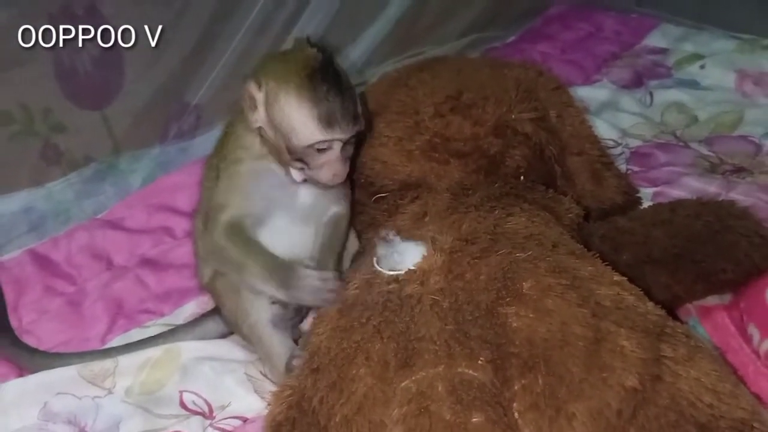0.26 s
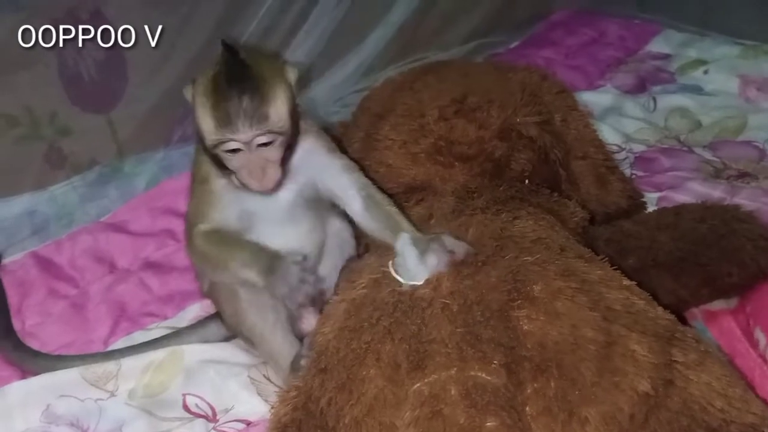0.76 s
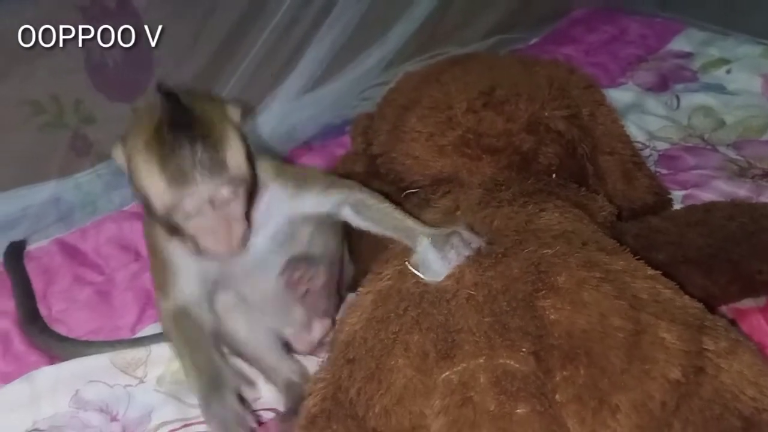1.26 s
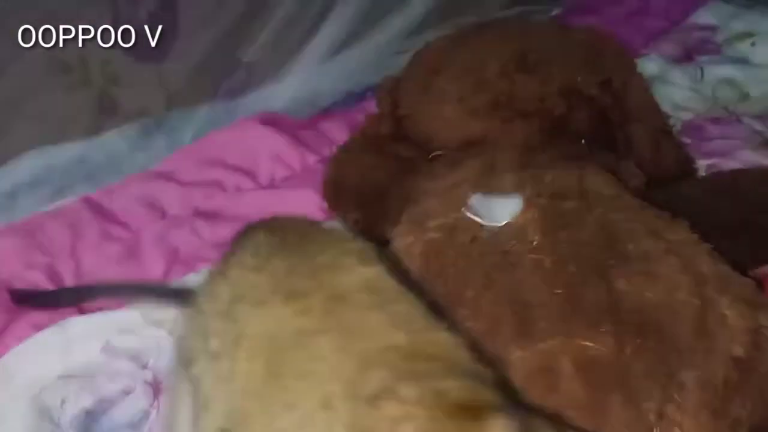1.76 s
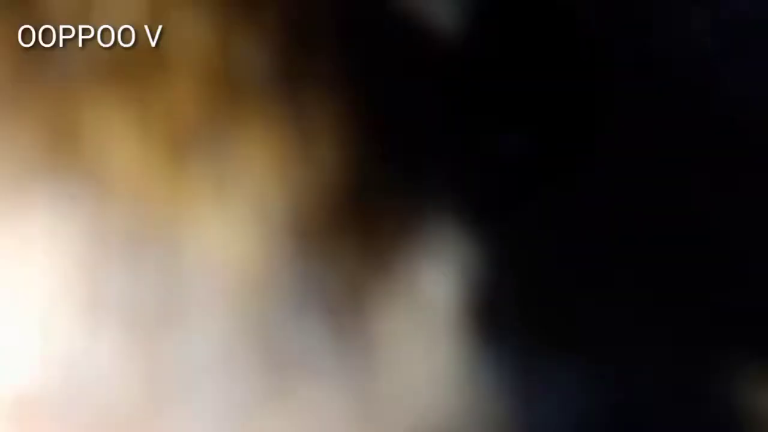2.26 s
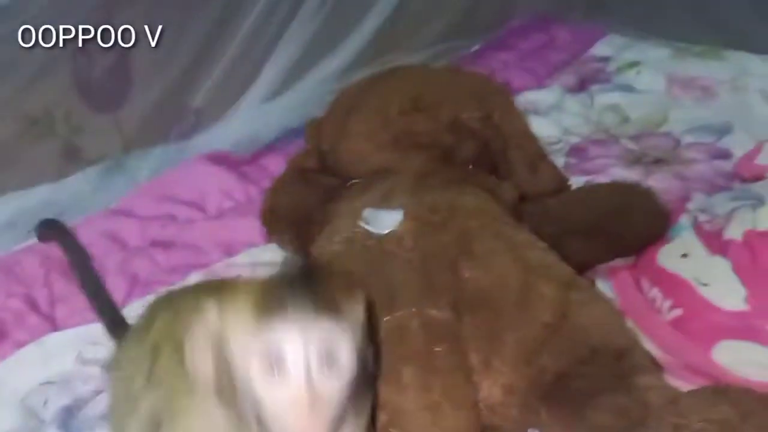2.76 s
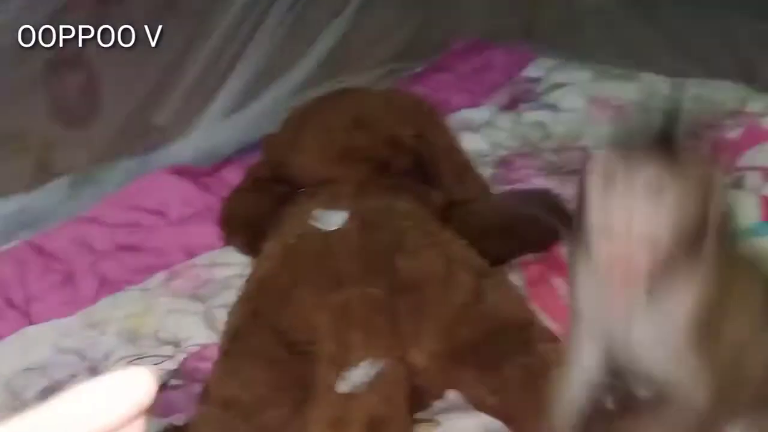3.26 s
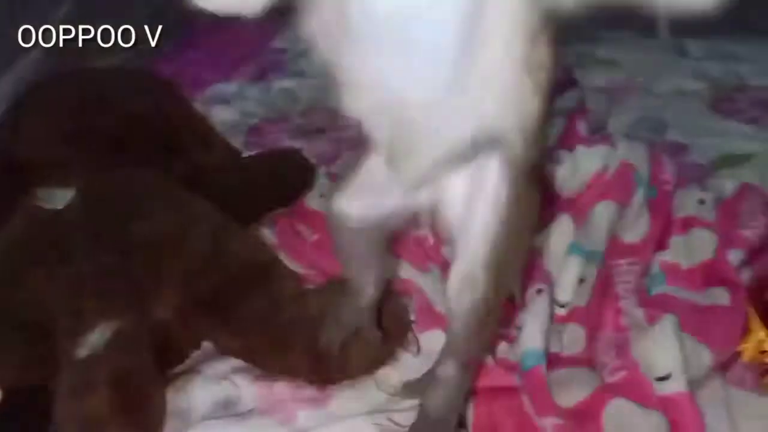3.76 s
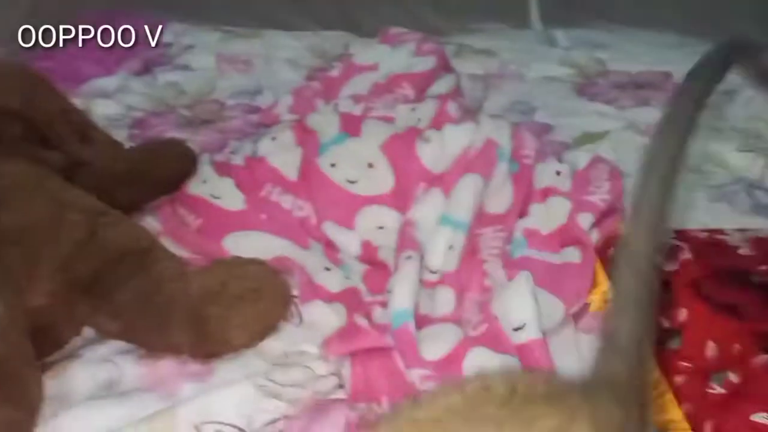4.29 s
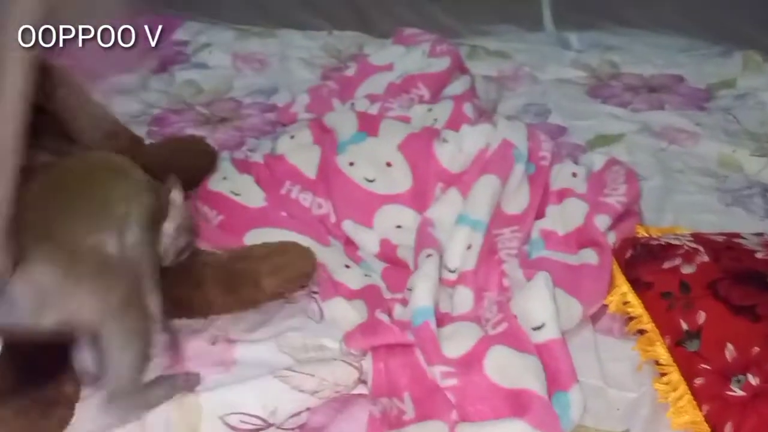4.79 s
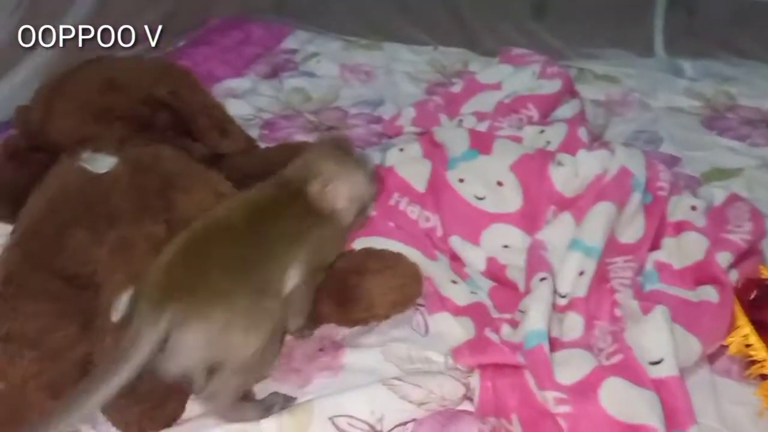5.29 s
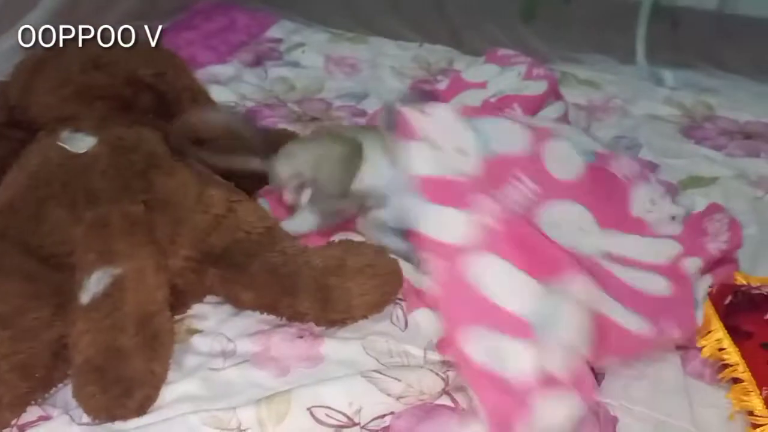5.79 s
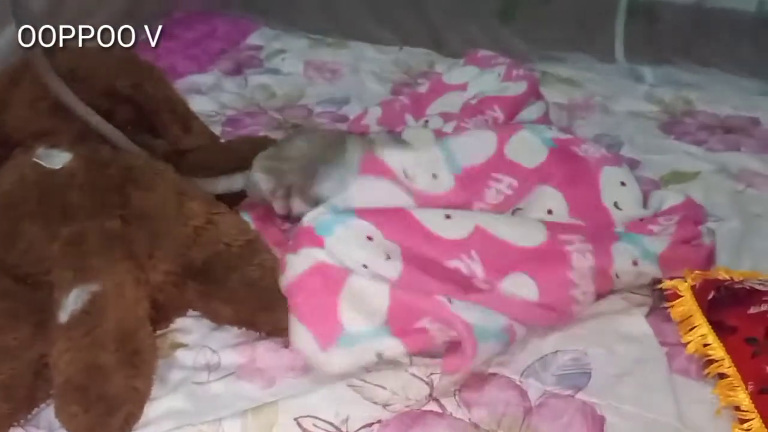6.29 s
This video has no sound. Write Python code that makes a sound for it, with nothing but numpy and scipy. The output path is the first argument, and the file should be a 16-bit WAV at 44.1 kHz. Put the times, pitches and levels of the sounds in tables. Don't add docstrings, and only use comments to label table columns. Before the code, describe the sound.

Steady quiet electrical hum with soft night hiss; a sudden burst of sharp clicks and fur scuffs hits the microphone, later a few isolated taps.

```python
import sys
import numpy as np
from scipy import signal
from scipy.fft import rfft, irfft, next_fast_len
from scipy.io import wavfile
from scipy.ndimage import uniform_filter1d

SR = 44100
rng = np.random.default_rng(int(sys.argv[2]) if len(sys.argv) > 2 else 0)


def int16_out(signal):
    q = np.round(np.clip(np.atleast_2d(signal).T, -1, 1) * 32767)
    wavfile.write(sys.argv[1], SR, q.astype(np.int16))


def convert_level_to_amplitude(level_db):
    exponent = np.asarray(level_db, float) / 20
    return 10 ** exponent


N = 288414
t = np.arange(N) / SR
HALF_EACH_SIDE = np.array([[.5], [-.5]])


def level(x, db):
    return x * convert_level_to_amplitude(db) / np.sqrt(np.mean(x ** 2))


def pan(db):
    return convert_level_to_amplitude(np.array([[min(db, 0)], [min(-db, 0)]]))


def walk(rate_hz):
    k = 8
    held = np.repeat(rng.standard_normal(int(rate_hz * N / SR) + 2), k)
    smooth = uniform_filter1d(uniform_filter1d(held, k), k)
    return 1.44 * np.interp(t * rate_hz * k, np.arange(len(held)), smooth)


def ring(x, hz, width_hz):
    return signal.lfilter(*signal.iirpeak(hz, hz / width_hz, fs=SR), x)


PLACES_S = [0, 1.9, 2.3, 3.4, 4.0, 6.54]


def by_place(first_db, second_db, third_db):
    return np.interp(t, PLACES_S, np.repeat([first_db, second_db, third_db], 2))


# (harmonic, level at first place [dB], at second [dB], at third [dB], left minus right [dB])
HUM = [(1, -57.5, -61.5, -61, -1), (2, -71, -72.5, -71.5, -0.5), (3, -66.5, -68, -76, 0.5),
       (4, -82.5, -80.5, -79.5, -5.5), (5, -72, -76, -75, -4), (6, -76, -75.5, -73.5, 9),
       (7, -74, -79, -71, 0), (8, -78.5, -78, -76, -1.5), (9, -81.5, -80.5, -81, -7),
       (12, -82, -89, -89.5, 4), (14, -79.5, -80, -79.5, 0.5)]
LEAD = [.1, -.1, .7, .6, .15, -2.0, -.7, .8, 1.8, 0, 0, .1, 0, 2.5]
SLIPS = [(1, -3), (1, -1), (1, 1), (1, 2), (1, 3), (2, -2), (2, -1), (3, 3), (6, -3)]
# (level before the phone first moves [dB], level after [dB])
SLIP_DB = [(-70.5, -80), (-80.5, -87), (-73.5, -67.5), (-75, -73), (-73, -79), (-74.5, -81), (-79, -100),
           (-81.5, -75), (-75, -101)]


def motor():
    mains2_hz, slip_hz, throb_peak_s = 100.51, 3.875, 0.3196
    start = 2 * np.pi * rng.random(len(LEAD))
    pan_of = {int(round(k)): pan_db for k, *_, pan_db in HUM}
    lines = [(int(round(k)), 0, db) for k, *db, _ in HUM]
    for (k, slips), (before_db, after_db) in zip(SLIPS, SLIP_DB):
        lines.append((int(round(k)), slips, (before_db, after_db, after_db)))
    out = 0
    for k, slips, db in lines:
        phase = 2 * np.pi * (k * mains2_hz * t + slips * slip_hz * (t - throb_peak_s)) + start[k - 1]
        if k > 1 or abs(slips) > 2:
            phase += 2 * np.pi * rng.random()
        wander_db = (0.57 + 1.0 * (slips != 0 or k % 2 == 0)) * walk(2.49)
        gain = np.sqrt(2) * convert_level_to_amplitude(by_place(*db) + wander_db + pan_of[k] * HALF_EACH_SIDE)
        out = out + gain * np.sin(phase + LEAD[k - 1] * HALF_EACH_SIDE)
    return out


def on_log_hz(hz, table):
    points = np.array(table)
    return np.interp(np.log(hz + 1), np.log(points[:, 0]), points[:, 1])


def hiss(shape, pan_db, alike_hz, swell_db, flicker_db):
    size = next_fast_len(N)
    hz = np.fft.rfftfreq(size, 1 / SR)
    colour = convert_level_to_amplitude(on_log_hz(hz, shape)) * (hz < shape[-1][0] * 1.5)
    mid, side = rfft(rng.standard_normal((2, size))) * colour
    alike = .88 / (1 + (hz / alike_hz) ** 2)
    both = np.sqrt(1 + alike) * mid + np.sqrt(1 - alike) * side * np.array([[1], [-1]])
    both = both * convert_level_to_amplitude(pan_db(hz) * HALF_EACH_SIDE)
    out, swell = 0, walk(1.5)
    for octave in range(5, 15):
        share = np.clip(1 - abs(np.log2(hz + 1) - octave), 0, 1)
        band = irfft(both * share, size)[:, :N]
        out = out + band * convert_level_to_amplitude(swell_db * swell + flicker_db * walk(9))
    return level(out, 0)


# (frequency [Hz], level per Hz [dB])
AIR = [(25, -23.5), (52, 4), (66, -7), (85, 10.5), (130, 6.5), (200, 0.5), (260, 0.5), (400, -3), (700, -1),
       (1000, -3.5), (1600, -13)]
AIR_DB = [-62, -64, -62.5]


def fan_air():
    wind = hiss(AIR, lambda hz: .5 + 0 * hz, alike_hz=520.0, swell_db=0.7, flicker_db=1.3)
    return wind * convert_level_to_amplitude(by_place(*AIR_DB))


# (frequency [Hz], level per Hz [dB])
NIGHT = [(760, -28.5), (1300, -5), (1700, -4.5), (2260, 1.5), (2900, -4), (3600, -12.5), (4600, -6.5),
         (6300, -11), (7800, -16), (8800, -12), (9800, -21), (11300, -18.5), (12300, -33), (13600, -26.5),
         (16400, -49)]
NIGHT_DB = [-64.5, -66, -66]
# (frequency [Hz], left minus right [dB])
NIGHT_PAN = [(1500, -0.5), (2400, 3), (3600, 2.5), (5000, 9.5), (8000, -0.5), (15000, -4)]


def night_air():
    far = hiss(NIGHT, lambda hz: on_log_hz(hz, NIGHT_PAN), alike_hz=550., swell_db=0.13, flicker_db=0.25)
    low_cut = signal.butter(2, 1300, "high", fs=SR, output="sos")
    return signal.sosfilt(low_cut, far * convert_level_to_amplitude(by_place(*NIGHT_DB)))


# (pitch [Hz], width [Hz], level [dB])
CRICKETS = [
    (5820, 190, -71.5),
    (5660, 49, -74.5),
    (5816, 80, -74.5),
    (5520, 250, -79),
]


def crickets():
    chorus_hz, chorus_peak_s = 4.416, .105
    out = 0
    for hz, width_hz, db in CRICKETS:
        late_s = (5800 - hz) * 6e-5
        chorus = np.cos(2 * np.pi * chorus_hz * (t - chorus_peak_s - late_s + 0.0063 * walk(1.4)))
        swell = np.clip(chorus + 1.22, 0, 9) ** 0.69 + 0.092
        scrape = 1 + 0.33 * np.cos(2 * np.pi * (45.0 * t + 1.394 * walk(3.6)))
        wing = ring(ring(rng.standard_normal((2, N)), hz, width_hz), hz, width_hz)
        out = out + level(wing * scrape * swell * convert_level_to_amplitude(0.5 * walk(2.67)), db)
    return out * pan(14.2) * 1.43


# (frequency [Hz], width [Hz], level [dB])
PORT = [(650, 410, 8), (1533, 780, 4), (2100, 1430, 4), (4670, 1100, -9.5), (6110, 1600, -10.5),
        (8300, 1230, -14.5), (11440, 2800, -16.5), (13420, 2200, -23.5)]


def port(x, treble_db):
    out = 0
    for hz, width_hz, db in PORT:
        out = out + convert_level_to_amplitude(db + treble_db * (hz > 4000)) * ring(ring(x, hz, width_hz), hz, width_hz)
    return out


def drag(out, tufts, top_s, rise_s, fall_s, db, treble_db, pan_db):
    span = slice(int(top_s * SR) - 8000, int(top_s * SR) + 16000)
    size = len(t[span])
    grains = rng.standard_normal((2, size)) * convert_level_to_amplitude(2.0 * rng.exponential(size=(2, size)))
    press = np.interp(t[span], [top_s - rise_s, top_s, top_s + fall_s], [0, 1, 0]) * tufts[span]
    steady = port(grains, treble_db)
    out[:, span] += pan(pan_db) * port(grains * press, treble_db) * convert_level_to_amplitude(db) / steady.std()


# (peak time [s], rise [s], fall [s], level [dB], left minus right [dB])
RUBS = [(1.36, .05, 0.087, -66, 5), (1.891, 0.0043, 0.0081, -37.5, 2.5), (1.907, .012, 0.042, -38.5, -5.5),
        (1.967, 0.005, .0068, -42, -5), (1.976, 0.0054, 0.042, -45, -2), (2.012, 0.0059, .008, -39, 10),
        (2.03, 0.014, 0.028, -48, 4), (2.062, 0.013, 0.021, -40, 10), (2.103, 0.033, 0.0092, -32.5, 32),
        (2.112, 0.0044, 0.0065, -27, 42), (3.759, 0.012, 0.007, -42.5, 11), (3.773, 0.013, 0.016, -41.5, 9),
        (3.795, 0.019, 0.016, -41, 20)]


def rubs():
    out, tufts = np.zeros((2, N)), convert_level_to_amplitude(1.7 * walk(600))
    for top_s, rise_s, fall_s, db, pan_db in RUBS:
        treble_db = min(1.9 * (db + 38), 6)
        drag(out, tufts, top_s, rise_s, fall_s, db, treble_db, pan_db)
    return out


def touch(out, s, db, signed_hz, cycles, crack_db, pan_db):
    at, half = int(s * SR), 1024
    cavity = signal.butter(5, [110, 3050], "band", fs=SR, output="sos")
    since = (np.arange(-half, half) + at - s * SR) / SR
    turns = since * abs(signed_hz)
    rise = np.exp(-(turns / min(0.68 * cycles, 0.00065 * abs(signed_hz))) ** 2)
    shape = np.where(turns < 0, rise, np.exp(-abs(turns) / cycles))
    squeeze = signal.sosfiltfilt(cavity, shape * np.cos(2 * np.pi * turns))
    grit = (1 + 0.37 * rng.standard_normal(2 * half)) * np.exp(-abs(since + 0.000303) * 60000)
    crack = port(grit - 0.85 * np.roll(grit, 1), 8.6)
    both = squeeze + convert_level_to_amplitude(crack_db) * crack / abs(crack).max()
    out[:, at - half:at + half] += np.sign(signed_hz) * pan(pan_db) * convert_level_to_amplitude(db) * both


# (time [s], left minus right [dB])
PAW_PAN = [(1.893, -13), (1.896, 17), (2.07, 24), (2.1, 60), (3.74, 18), (3.8, 22), (3.84, 11), (5.5, -25)]


def paw_pan(s):
    return np.interp(s, *np.array(PAW_PAN).T)


# (time [s], peak level [dB], ring [Hz, minus for a pull], fade [cycles], crack [dB])
NAILS = [(1.8922, -25, -900, 0.37, -13), (1.903, -23, 1498, 0.39, -10), (1.99, -33, 2300, .8, -12),
         (1.9962, -0.5, 2002, .8, -22), (2.0105, -29, 2200, 2.4, -6), (2.015, -26, 2450, 2.4, -30),
         (2.0178, -29, 2200, 2.2, -21), (2.0543, -22, 2600, 1.4, -0.5), (2.06, -49, -2500, .46, 12),
         (2.10258, -1.5, 2100, .85, -15), (2.10958, -9.5, 1800, .5, -13), (2.1062, -17, 1500, 0.19, -9),
         (3.744, -24.5, -2400, 0.53, -19), (3.7477, -20.5, -2000, 0.21, -18),
         (3.7962, -19.5, 2100, 0.38, -14), (3.799, -29, 1100, 0.25, -12),
         (5.54212, -18.5, -2300, 0.88, -10.5)]


def nails():
    out = np.zeros((2, N))
    for s, db, signed_hz, cycles, crack_db in NAILS:
        touch(out, s, db, signed_hz, cycles, crack_db, paw_pan(s))
    return out


# (time [s], peak level [dB], ring [Hz, minus for a pull], fade [cycles])
PADS = [(1.8973, -14.5, -700, .45), (1.9716, -28.5, -350, 0.43), (1.9975, -24.5, 800, 1.1),
        (2.055, -24.5, -800, .31), (2.1025, -13.5, 680, 1.0), (2.10955, -10.5, 640, .85),
        (3.7447, -26.5, -480, 2.3), (3.7968, -29, -340, 1.6), (3.7998, -19.5, -900, 0.45),
        (3.8415, -38.5, 400, 0.34), (5.542, -18, -780, 0.46), (5.543, -26.5, 203, 0.19)]


def pads():
    out = np.zeros((2, N))
    for s, db, signed_hz, cycles in PADS:
        touch(out, s, db, signed_hz, cycles, -39, paw_pan(s))
    return out


# (time [s], peak level [dB], crack [dB])
TICKS = [
    (2.1866, -39, -22),
    (2.346, -47, -18),
    (2.377, -52, -18),
    (2.418, -51, -20),
    (2.5742, -43, -17),
    (2.99, -53, 6),
    (5.5955, -52, -8),
]


def ticks():
    out = np.zeros((2, N))
    for s, db, crack_db in TICKS:
        touch(out, s, db, 2850, 1.2, crack_db, 9)
    return out


# (peak time [s], rise [s], fall [s], level [dB], left minus right [dB])
RUSTLES = [
    (4.02, 0.24, 0.34, -67, 5),
    (5.556, .011, 0.14, -64, -20),
]


def rustles():
    out, tufts = np.zeros((2, N)), convert_level_to_amplitude(1.7 * walk(600))
    for top_s, rise_s, fall_s, db, pan_db in RUSTLES:
        drag(out, tufts, top_s, rise_s, fall_s, db, 12, pan_db)
    return out


def scene():
    room = motor() + fan_air() + night_air() + crickets()
    return room + rubs() + nails() + pads() + ticks() + rustles()


def band_limit(x):
    return signal.sosfilt(signal.butter(12, 16520, fs=SR, output="sos"), x)


def record(dry):
    rumble_cut = signal.butter(2, 50, "high", fs=SR, output="sos")
    top_cut = signal.ellip(6, .3, 40, 15300, fs=SR, output="sos")
    mix = signal.sosfilt(np.vstack([rumble_cut, top_cut]), dry)
    return band_limit(mix)


dry = scene()
out = record(dry)
int16_out(out)
```